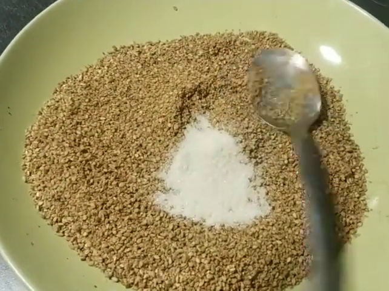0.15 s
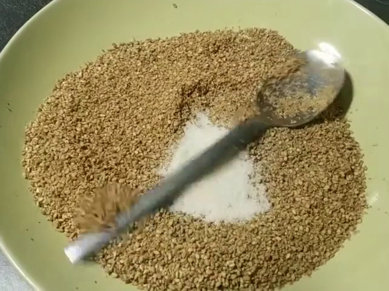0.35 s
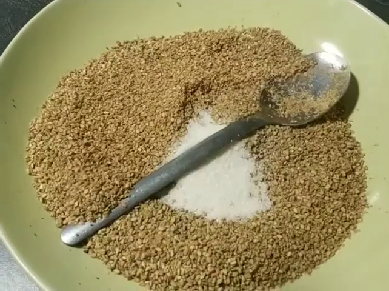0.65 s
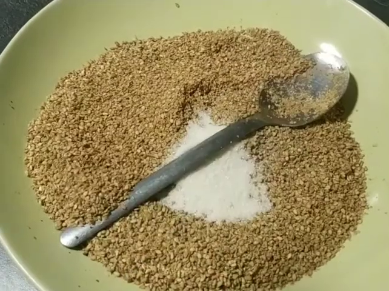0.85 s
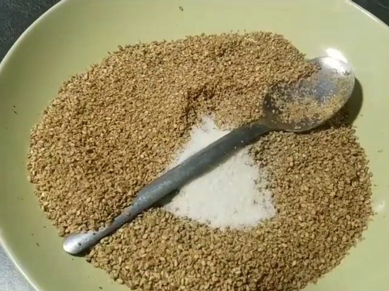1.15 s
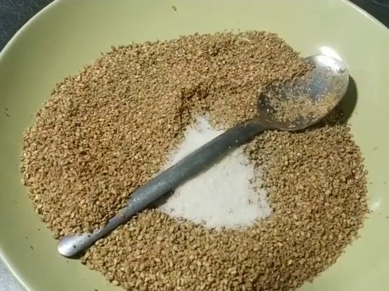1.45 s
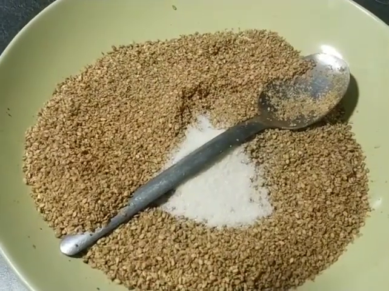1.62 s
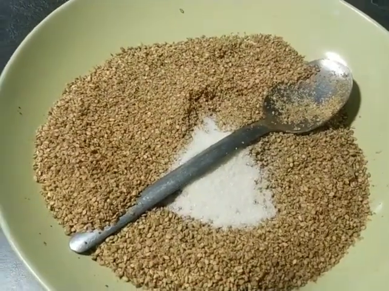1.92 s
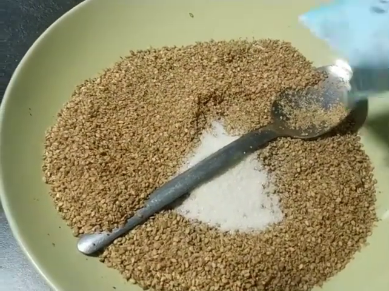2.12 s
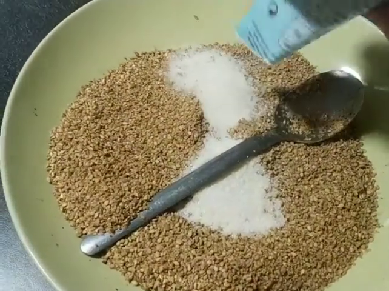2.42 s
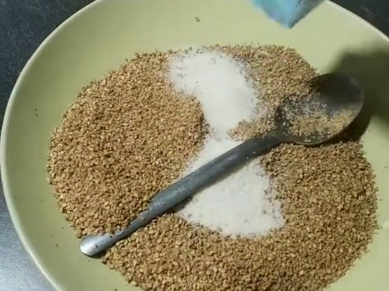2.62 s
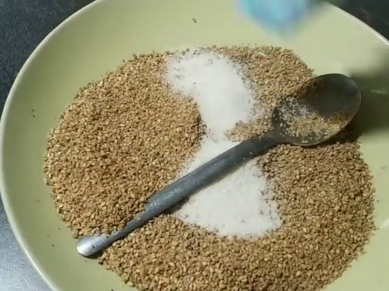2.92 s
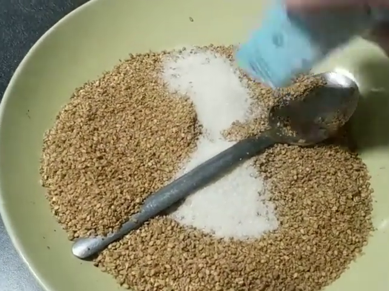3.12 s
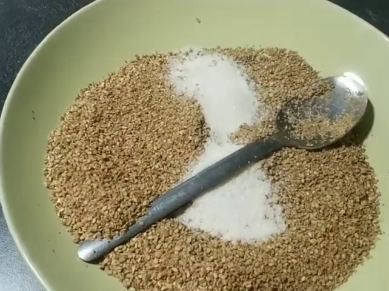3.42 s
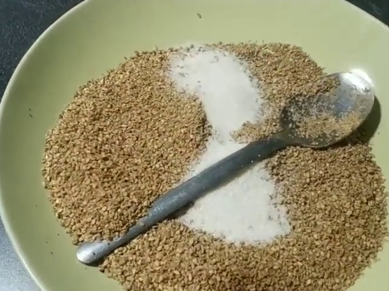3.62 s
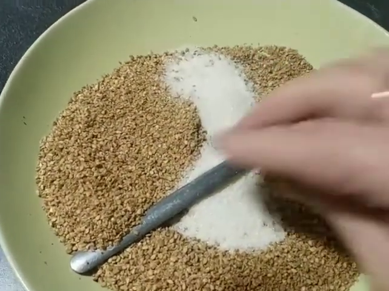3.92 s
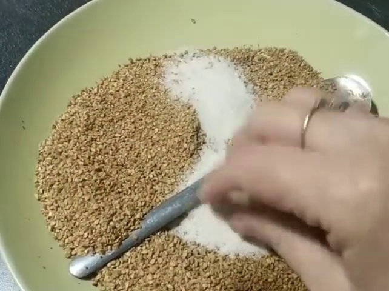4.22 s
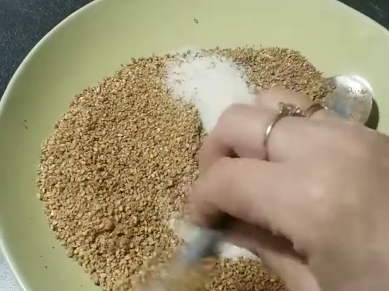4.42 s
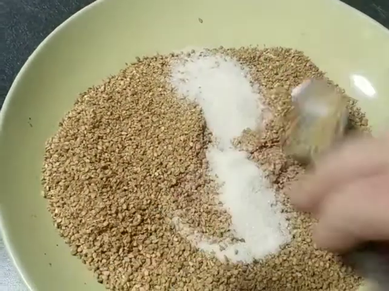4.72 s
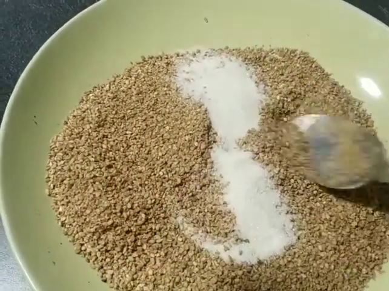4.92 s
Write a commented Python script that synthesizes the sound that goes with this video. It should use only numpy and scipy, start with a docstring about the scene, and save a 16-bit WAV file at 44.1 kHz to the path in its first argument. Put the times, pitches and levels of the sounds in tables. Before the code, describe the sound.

A metal spoon scrapes and rattles on a ceramic plate of seeds, a paper packet crinkles, sugar hisses out, then soft stirring resumes.

```python
"""Spoon, seeds and sugar

A metal spoon scrapes through seeds on a ceramic plate, rattles and is laid down: ringing modes, grain noise.
A small packet is fingered and snaps (crinkle grains, short resonances) amid knocks and a soft handling bump.
Sugar pours from it onto the seeds as a dense stream of grains; then the spoon squeaks, the plate rocks
with a low knock (narrow resonances) and the spoon stirs again.
Close and in stereo, in a small kitchen with a low hum of shaped noise."""
import sys
import numpy as np
from scipy import signal
from scipy.fft import rfft, irfft, next_fast_len
from scipy.io import wavfile
from scipy.ndimage import uniform_filter1d

SR = 44100
rng = np.random.default_rng(int(sys.argv[2]) if len(sys.argv) > 2 else 0)


def put_to_file(sound):
    """Save the sound as 16-bit audio at rate SR, in the file named by the first command-line argument."""
    columns = np.atleast_2d(sound).T  # one column per channel
    safe = np.clip(columns, -1, 1)
    whole_steps = np.round(safe * 32767)
    wavfile.write(sys.argv[1], SR, whole_steps.astype(np.int16))


N = 222925
TIME_S = np.arange(N) / SR
CUTOFF_HZ = 14300

# table levels are relative; hum, seeds, packet and sugar add their own trim
# low kitchen noise: t/s, level/dB
HUM_LEVEL = [(0.452, -49.5), (.7, -48.5), (1.75, -45), (2.05, -48.5), (2.35, -43), (2.7, -49.5),
             (3.65, -49), (4.2, -51), (5.05, -49)]
# its spectrum: f/Hz, level/dB
HUM_SPECTRUM = [(12, -35.5), (20, 5), (46, 0), (69, -31), (99, -9.5), (202, -17.5), (226, -21),
                (361, -11.5), (403, -21.5), (438, -18.5), (531, -25.5), (593, -23), (1060, -29),
                (3100, -33), (14500, -69.5)]
# centres of brief dips in the low noise and hiss: t/s
DIP_TIMES_S = [.5, 0.941, 1.95, 2.9, 4.12]
DIP_DB, DIP_WIDTH_S = -4, 0.045
# modes of spoon and plate in contact: f/Hz, level/dB, t60/s
SPOON_PLATE_MODES = [(161.4, -13.5, 0.13), (578.4, -4, 0.045), (1325.4, 0, 0.38), (1660, -18, .15),
                     (2188, -8, 0.55), (2740, -10.5, 0.17), (3191, 2.5, 0.22), (3240, -5.5, 0.078),
                     (3950, -17, .2), (4306, -1, 0.23), (4266, -4, 0.11), (5517, -2.5, 0.095),
                     (6185, -11.5, 0.17), (6870, 1, 0.16), (8349, 1.5, 0.18), (9300, -19, .2),
                     (9450, -7, .2), (9895, -6.5, 0.35), (9960, -2, .22), (10444, -11.5, 0.25),
                     (11330, -2.5, 0.13), (11900, -14, .12), (11460, 2.5, 0.12), (12400, -25, .16),
                     (13490, 0.5, 0.15), (13570, -1, 0.18), (13679, -8.5, .2), (13720, -3.5, .12)]
# spoon chatters on plate: t/s, length/s, share of ring time left by the grip/1,
# level/dB, low modes/dB, high modes/dB (both relative to level)
SPOON_CONTACTS = [(.001, 0.007, 0.68, -15, -7.5, -2), (.03, 0.01, 0.95, -25.5, -17, 3),
                  (.043, .006, 0.99, -16.5, -17, -39), (.056, 0.034, 1, -17, -10.5, -11.5),
                  (.093, 0.0046, 0.85, -20.5, 2, -1), (.106, 0.0077, 1, -25.5, 10, 1.5),
                  (.127, 0.0059, 0.64, -25, -3, -5), (.14, 0.013, 1, -28.5, 6.5, 9),
                  (.159, 0.021, 1, -26, -10, 2), (.228, 0.011, 0.69, -46, -7, 14),
                  (.245, 0.0022, 0.52, -26.5, -19, -13), (.263, 0.023, .82, -22, -9.5, -3.5),
                  (.31, 0.03, 0.75, -29.5, -1, -1), (.375, 0.016, 0.73, -33, -3, -5.5),
                  (0.512, 0.0068, 0.18, -62, 21, 3), (4.204, 0.037, .9, -58, -16.5, -7),
                  (4.37, 0.084, 0.24, -41.5, -8, -6.5), (4.408, 0.036, 0.34, -42.5, -4, -5),
                  (4.433, 0.0048, 0.55, -34, -4.5, -12.5), (4.751, .05, 0.92, -70, 0, 1),
                  (4.968, .007, 0.69, -60, -6, -2)]
# centres of low, middle and high modes: f/Hz
MODE_REGISTERS_HZ = [1500, 3500, 7350]
# spectrum of ground seeds: f/Hz, level/dB
CRUNCH_SPECTRUM = [(130, 9.5), (600, -1.5), (1000, -5.5), (2000, -5.5), (3300, 1), (5000, -11), (7500, -10),
                   (10000, -7.5), (13300, -2.5), (15000, -5)]
CRUNCH_ATTACK_S, CRUNCH_RELEASE_S = 0.004, 0.045
CRUNCH_LATE_SHARE = 0.3  # full crunch starts this far into the contact
# flow of seeds sliding off the spoon: t/s, level/dB
SLIDE_FLOW = [(4.52, -62), (4.542, -72), (4.656, -57.5), (4.716, -66), (4.744, -53.5), (4.91, -61.5),
              (5.05, -51)]
# its spectrum: f/Hz, level/dB
SLIDE_SPECTRUM = [(1180, -35), (2000, -12.5), (3690, -4.5), (4110, -11), (4470, -7.5), (4940, -24),
                  (5730, -33), (6070, -54), (8050, -12.5), (8750, -21), (9580, -12), (10900, -13),
                  (13100, 6), (14500, -27.5)]
# fingers rub the packet, sugar shifts inside: t/s, length/s, papery body/dB, treble hiss/dB
PACKET_RUBS = [(0.518, 0.07, -61, -58), (0.745, 0.038, -48, -38), (.84, 0.13, -50.5, -51),
               (0.988, 0.12, -48.5, -43), (1.104, 0.27, -47, -43), (1.442, 0.083, -57, -47.5),
               (1.561, 0.17, -50, -40), (1.72, 0.05, -54, -32.5), (1.818, 0.057, -52, -49.5),
               (2.64, 0.22, -66, -60.5), (3.015, 0.018, -60, -51), (3.073, 0.02, -57, -50.5),
               (3.198, 0.057, -51.5, -47), (3.367, 0.066, -55, -53), (3.598, 0.033, -39.5, -33),
               (3.686, 0.054, -50, -54), (3.82, .25, -69, -70.5)]
RUB_ATTACK_S, RUB_RELEASE_S = 0.019, 0.04
# spectrum of the papery body: f/Hz, level/dB
PACKET_BODY_SPECTRUM = [(300, 13), (800, 0.5), (1500, -8), (2700, 5.5), (4200, 3.5), (6000, -9.5),
                        (9000, -36)]
# spectrum of the packet's hiss: f/Hz, level/dB
PACKET_HISS_SPECTRUM = [(3000, -8), (6000, -11), (9000, 0), (11500, 3), (13500, 6.5), (15000, 16.5)]
# things knock and shuffle on the worktop; at 2.764 s a deep, soft handling bump:
# t/s, length/s, resonance f/Hz, resonance level/dB, thud edge f/Hz, thud level/dB
KNOCKS_AND_BUMP = [(.594, 0.017, 278, 13.5, 1390, 7.5), (.638, 0.11, 307, 10, 1250, .5),
                   (0.779, 0.029, 560, 6.5, 1500, -14), (.833, 0.037, 200, 14, 1500, -10),
                   (1.2808, 0.011, 2680, 25.5, 3750, 9.5), (2.4264, 0.0027, 410, 14.5, 3630, 8),
                   (2.6216, 0.0028, 2420, 7.5, 2700, -4), (2.764, 0.039, 34.8, 25, 587, -8),
                   (3.584, 0.006, 140, 14, 3500, 9.5), (3.5889, 0.0052, 3280, 11, 4200, 17),
                   (3.603, 0.021, 2540, -1, 4000, -5), (3.6272, 0.0052, 3120, 14.5, 4650, 21),
                   (3.634, 0.0066, 255, 19, 4430, 4), (3.686, 0.021, 468, 7.5, 3720, -1)]
KNOCK_WIDTH_SHARE, KNOCK_WIDEST_HZ = 0.67, 570  # resonance width / pitch, and its limit
KNOCK_FIZZ_DB = -30.5  # relative to the thud
# colour of every thud, worktop and what lies on it: f/Hz, width/Hz, level/dB
WORKTOP_MODES = [(111, 12, 5), (279, 32, 4), (565, 28, 7.5), (850, 180, -3.5), (1043, 110, 0),
                 (1340, 40, 3.5), (1630, 38, 8), (2260, 79, -20), (2310, 56, 7.5), (2590, 67, 9.5),
                 (3300, 210, 5), (4000, 110, -23)]
# packet crinkles and snaps: t/s, length/s, resonance f/Hz, resonance level/dB,
# thud level/dB, fizz level/dB
PACKET_SNAPS = [(0.772, 0.022, 4200, 0.5, -26, -10), (0.812, 0.0082, 3300, 2.5, -7, -24),
                (0.858, 0.0013, 2930, 1, -17, -10), (0.893, 0.00078, 3500, -11, -8, -10),
                (0.981, 0.0037, 2940, -1, -15, -30), (1.094, 0.00014, 3390, 21.5, 4.5, -12),
                (1.0955, 0.0083, 3970, 7, -7, 8.5), (1.213, 0.016, 3650, 4, -11, -6.5),
                (1.2733, 0.0042, 3500, 17.5, 2.5, 0), (1.285, .012, 3740, 8.5, -15, -3.5),
                (1.333, 0.069, 2310, 5.5, -3, -8), (1.39, 0.00082, 2260, 2, -28, -21),
                (2.525, 0.011, 3000, -13, -17, -19), (2.941, 0.016, 3000, -17, -16, -21),
                (3.287, 0.0051, 4200, -9.5, -19, -7.5), (3.346, 0.026, 3130, 0.5, -5.5, -14),
                (3.431, 0.019, 2500, 0, -11, -13), (3.547, 0.017, 2820, 3.5, -7, 0),
                (3.562, 0.06, 2760, 9.5, 0.5, 1), (3.726, 0.014, 2650, -7.5, -2, -9),
                (3.801, .0023, 2980, -15.5, -15, -25)]
SNAP_WIDTH_HZ, SNAP_EDGE_HZ = 1500, 4320
# flow of sugar onto the seeds: t/s, level/dB
POUR_FLOW = [(1.94, -67.5), (2.084, -34.5), (2.238, -26), (2.274, -32), (2.388, -39), (2.452, -52),
             (2.52, -52.5), (2.528, -50), (2.6, -63.5)]
# its spectrum: f/Hz, level/dB
POUR_SPECTRUM = [(240, -46), (400, -21), (431, -18), (741, -13), (900, -21), (1230, -16), (1770, -12),
                 (2090, -2), (2660, -8), (3230, -5), (3920, -3), (6740, -13.5), (13300, 2), (14500, -4)]
# spoon squeaks on the glaze, and a low knock (425 Hz) as the plate rocks: t/s, f/Hz, level/dB
SQUEAKS_AND_ROCK = [(4.37, 4820, -2.5), (4.39, 3450, 6), (4.424, 4280, 1), (4.443, 425, 14.5),
                    (4.68, 3710, -7)]
SLIP_S, SLIP_WIDTH_HZ = 0.025, 125
# reverberation time of the kitchen: f/Hz, t60/s
KITCHEN_T60 = [(150, 0.27), (800, .42), (3000, 0.04), (13000, 0.16)]


def from_db(db):
    """Decibels to gain."""
    return np.exp(np.asarray(db) * np.log(10) / 20)


def rms_one(x):
    """Scale to unit power."""
    return x / np.sqrt(np.mean(x ** 2) + 1e-20)


def at_hz(points, hz):
    """Read an (f/Hz, value) table on a log-frequency axis."""
    f_hz, value = np.transpose(points)
    return np.interp(np.log(np.maximum(hz, 1)), np.log(f_hz), value)


def level(rows):
    """Gain from a (t/s, level/dB) curve, fading out beyond its ends."""
    t_s, db = np.transpose(rows)
    outside_s = np.maximum(t_s[0] - TIME_S, 0) + np.maximum(TIME_S - t_s[-1], 0)
    return from_db(np.interp(TIME_S, t_s, db)) * np.exp(-outside_s / 0.026)


def drift(knots_per_s):
    """Random curve of straight segments, rms 1."""
    knots = rng.standard_normal(int(knots_per_s * N / SR) + 2)
    return rms_one(np.interp(TIME_S * knots_per_s, np.arange(len(knots)), knots))


def colour(x, points):
    """Give a steady texture its spectrum; rms 1."""
    size = next_fast_len(N, real=True)
    f_hz = np.arange(size // 2 + 1) * SR / size
    gain = from_db(at_hz(points, f_hz))
    return rms_one(irfft(rfft(x, size) * gain, size)[:N])


def cut(x, hz, kind, order=2):
    """Butterworth filter."""
    edge_hz = np.clip(hz, 10, 0.45 * SR)
    return signal.sosfilt(signal.butter(order, edge_hz, kind, fs=SR, output="sos"), x)


def resonance(x, hz, width_hz):
    """Two-pole resonance with gain 1 on top."""
    r = np.exp(-np.pi * width_hz / SR)
    zeros = np.array([1, 0, -1]) * (1 - r * r) / 2
    poles = [1, -2 * r * np.cos(2 * np.pi * hz / SR), r * r]
    return signal.lfilter(zeros, poles, x)


def add(out, t_s, sound):
    """Mix a sound in at t_s."""
    start = max(round(t_s * SR), 0)
    out[start:start + len(sound)] += sound[:N - start]


def grains(per_s, spread_db, clump_db, width_hz=1300, count=14):
    """Tiny collisions of uneven size, in clumps, each ringing under 1 ms at one of count pitches."""
    born = np.flatnonzero(rng.random(N) < per_s / SR)
    size_db = spread_db * np.minimum(rng.exponential(1, len(born)), 4) + clump_db * drift(130)[born]
    sizes = from_db(size_db) * rng.choice([-1, 1], len(born))
    pitch_index = rng.integers(0, count, len(born))
    out = np.zeros(N)
    for k, hz in enumerate(np.linspace(500, 14500, count)):
        clicks = np.full(N, 1e-18)
        clicks[born[pitch_index == k]] = sizes[pitch_index == k]
        out += resonance(clicks, hz, width_hz)
    return out


def slips(length_s, size, rise_share=0.11):
    """First touch, then a run of random slips that builds up and dies after length_s; energy 1."""
    age = np.arange(size) / SR / max(length_s, 1e-4)  # in lengths
    shape = (1 - np.exp(-age / rise_share)) * np.exp(-np.minimum(age, 6) ** 2)
    run = rng.standard_normal(size) * (rng.random(size) < 0.3) * shape
    run[0] = 2
    return run / np.sqrt(np.sum(run ** 2))


def strokes(rows, attack_s, release_s):
    """Each (t/s, length/s, level/dB) stroke swells up to t, holds and dies away; powers sum."""
    power = np.zeros(N)
    for t_s, length_s, db in rows:
        before_s = np.maximum(t_s - TIME_S, 0)
        after_s = np.maximum(TIME_S - t_s - length_s, 0)
        fade = before_s / attack_s + after_s / release_s
        power += (from_db(db) * np.exp(-np.minimum(fade, 20))) ** 2
    return np.sqrt(power)


def blow(length_s, hz, width_hz, ring_db, edge_hz, thud_db, fizz_db,
         fizz_hz=9500, lowest_hz=85, direct_db=-3):
    """A run of slips excites a dull thud, one short resonance and a bright fizz."""
    force = slips(length_s, size=SR // 6)
    ring = resonance(resonance(force, hz, width_hz), hz, width_hz)
    worktop = sum(from_db(db) * resonance(force, f_hz, w_hz) for f_hz, w_hz, db in WORKTOP_MODES)
    body = from_db(direct_db) * force + worktop / 2
    thud = cut(cut(body, edge_hz, "low", order=6), lowest_hz, "high")
    fizz = cut(force, fizz_hz, "high", order=3)
    return from_db(ring_db) * ring + from_db(thud_db) * thud + from_db(fizz_db) * fizz


def background(hum_db=2, drone_db=-51, drone_hz=41, drone_width_hz=4, lowest_hz=70,
               rumble_db=-51, rumble_hz=26, hiss_db=-72, hiss_hz=9500):
    """Shaped noise and faint hiss over a wavering low drone (narrow-band noise) and deep rumble."""
    t_s, db = np.transpose(HUM_LEVEL)
    dips_db = DIP_DB * sum(np.exp(-((TIME_S - dip_s) / DIP_WIDTH_S) ** 2) for dip_s in DIP_TIMES_S)
    air = cut(colour(rng.standard_normal(N), HUM_SPECTRUM), lowest_hz, "high", order=4)
    air = from_db(hum_db + np.interp(TIME_S, t_s, db) + dips_db) * rms_one(air)
    drone = rms_one(resonance(rng.standard_normal(N), drone_hz, drone_width_hz))
    rumble = rms_one(cut(rng.standard_normal(N), rumble_hz, "low", order=4))
    hiss = rms_one(cut(rng.standard_normal(N), [hiss_hz, CUTOFF_HZ], "band"))
    hiss = from_db(hiss_db + dips_db) * hiss
    return air + hiss + from_db(drone_db) * drone + from_db(rumble_db) * rumble


def spoon(uneven_db=1.0, waver_db=1.5, waver_per_s=100):
    """Each contact feeds every mode, with its own mix of low, middle and high modes."""
    forces = [slips(contact[1], size=SR // 3) for contact in SPOON_CONTACTS]
    out = np.zeros(N)
    for hz, mode_db, t60_s in SPOON_PLATE_MODES:
        mode, fed = np.zeros(N), np.zeros(N)
        for (t_s, _, free, db, low_db, high_db), force in zip(SPOON_CONTACTS, forces):
            width_hz = np.log(1000) / (np.pi * t60_s * max(free, 0.1))
            ring = resonance(force, hz, width_hz)
            register_db = at_hz(list(zip(MODE_REGISTERS_HZ, (low_db, 0, high_db))), hz)
            ring_db = db + register_db + mode_db + uneven_db * rng.standard_normal()
            ring = from_db(ring_db) * ring / np.abs(ring).max()
            add(mode, t_s, ring)
            add(fed, t_s, ring ** 2)
        # the sliding contact point varies how well a mode radiates
        mode = mode * from_db(waver_db * drift(waver_per_s))
        # over 0.1 s a mode gives off just the energy fed into it
        energies = uniform_filter1d(np.array([fed, mode ** 2]), size=SR // 10)
        wanted, given = np.abs(energies) + 1e-12
        out += mode * np.sqrt(wanted / given)
    return out


def seeds(crunch_db=-5, slide_db=3):
    """Seeds are ground at each contact, most at the bright ones, and trickle off the spoon."""
    presses = [(t_s + CRUNCH_LATE_SHARE * length_s, (1 - CRUNCH_LATE_SHARE) * length_s, db + high_db)
               for t_s, length_s, _, db, _, high_db in SPOON_CONTACTS]
    pressure = strokes(presses, CRUNCH_ATTACK_S, CRUNCH_RELEASE_S)
    crunch = pressure * colour(grains(per_s=5000, spread_db=1.0, clump_db=0.5), CRUNCH_SPECTRUM)
    trickle = grains(per_s=14000, spread_db=1.0, clump_db=3.0)
    slide = level(SLIDE_FLOW) * colour(trickle, SLIDE_SPECTRUM)
    return from_db(crunch_db) * crunch + from_db(slide_db) * slide


def packet(body_db=1, hiss_db=2, uneven_db=2.5, uneven_per_s=35):
    """Fine crinkles under unevenly pressing fingers, and the hiss of sugar sliding inside."""
    crinkles = grains(per_s=9000, spread_db=1.5, clump_db=1.7)
    crinkles = crinkles * from_db(uneven_db * drift(uneven_per_s))
    body_rows = [(t_s, length_s, db) for t_s, length_s, db, _ in PACKET_RUBS]
    hiss_rows = [(t_s, length_s, db) for t_s, length_s, _, db in PACKET_RUBS]
    body = strokes(body_rows, RUB_ATTACK_S, RUB_RELEASE_S) * colour(crinkles, PACKET_BODY_SPECTRUM)
    hiss = strokes(hiss_rows, RUB_ATTACK_S, RUB_RELEASE_S) * colour(crinkles, PACKET_HISS_SPECTRUM)
    return from_db(body_db) * body + from_db(hiss_db) * hiss


def knocks_and_bump():
    """Each knock, and the soft bump, is a thud with one resonance and a trace of fizz."""
    out = np.zeros(N)
    for t_s, length_s, hz, ring_db, edge_hz, thud_db in KNOCKS_AND_BUMP:
        width_hz = min(KNOCK_WIDTH_SHARE * hz, KNOCK_WIDEST_HZ)
        fizz_db = thud_db + KNOCK_FIZZ_DB
        add(out, t_s, blow(length_s, hz, width_hz, ring_db, edge_hz, thud_db, fizz_db))
    return out


def snaps():
    """The packet buckles: mostly a papery resonance and fizz, with little weight."""
    out = np.zeros(N)
    for t_s, length_s, hz, ring_db, thud_db, fizz_db in PACKET_SNAPS:
        add(out, t_s, blow(length_s, hz, SNAP_WIDTH_HZ, ring_db, SNAP_EDGE_HZ, thud_db, fizz_db))
    return out


def sugar(pour_db=1):
    """A dense stream of crystals lands on the seeds."""
    crystals = grains(per_s=16000, spread_db=1.5, clump_db=1)
    return from_db(pour_db) * level(POUR_FLOW) * colour(crystals, POUR_SPECTRUM)


def squeaks_and_rock():
    """Runs of slips, each in one narrow resonance: spoon squeaks, and a low knock of the rocking plate."""
    out = np.zeros(N)
    for t_s, hz, db in SQUEAKS_AND_ROCK:
        force = slips(SLIP_S, size=SR // 6)
        ring = resonance(resonance(force, hz, SLIP_WIDTH_HZ), hz, SLIP_WIDTH_HZ)
        add(out, t_s, from_db(db) * ring)
    return out


def kitchen(x, early_db=-11, early_s=0.018, tail_db=-14, wall_hz=6000):
    """Room response of decaying noise: quick reflections, then a tail with a decay per band."""
    t_s = TIME_S[:SR * 2 // 3]
    edges_hz = np.geomspace(80, 16000, 9)
    tail = np.zeros(len(t_s))
    for lo_hz, hi_hz in zip(edges_hz, edges_hz[1:]):
        t60_s = at_hz(KITCHEN_T60, np.sqrt(lo_hz * hi_hz))
        band = cut(rng.standard_normal(len(t_s)), [lo_hz, hi_hz], "band")
        tail += band * from_db(-60 * t_s / t60_s)
    tail = cut(rms_one(tail * (t_s > 0.006)), wall_hz, "low", order=1)
    early = rng.standard_normal(len(t_s)) * np.exp(-t_s / early_s) * (t_s > 0.002)
    response = from_db(early_db) * rms_one(early) + from_db(tail_db) * tail
    return signal.fftconvolve(x, response / np.sqrt(len(t_s)))[:N]


def two_ports(x, side_db, side_hz=4200, bright_hz=9000, scatter_s=0.0014, shift_per_s=90):
    """Two close ports share the bass; scattered, shifting treble is added to one, taken from the other."""
    t_s = TIME_S[:SR // 40]
    scatter = rng.standard_normal(len(t_s)) * np.exp(-t_s / scatter_s)
    scatter = rms_one(scatter) / np.sqrt(len(t_s))
    side = signal.fftconvolve(x, scatter)[:N] * drift(shift_per_s)
    side = cut(cut(side, side_hz, "high", order=10), bright_hz, "high", order=1)
    side = from_db(side_db) * side
    return np.array([x + side, x - side])


def scene():
    """Stirring sits narrow; handling, sugar and background spread wider."""
    stirring = spoon() + seeds() + squeaks_and_rock()
    handling = packet() + knocks_and_bump() + snaps() + sugar()
    narrow = two_ports(stirring + kitchen(stirring), side_db=-13.5)
    wide = two_ports(handling + kitchen(handling) + background(), side_db=-2.5)
    return narrow + wide


def record(dry, top=1.0):
    """The loudest peaks are rounded below top, the treble is cut steeply."""
    rounded = dry / (1 + (dry / top) ** 4) ** (1 / 4)
    return signal.sosfilt(signal.ellip(10, 0.3, 80, CUTOFF_HZ, fs=SR, output="sos"), rounded)


dry = scene()
out = record(dry)
put_to_file(out)
```